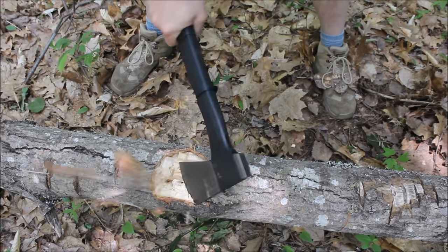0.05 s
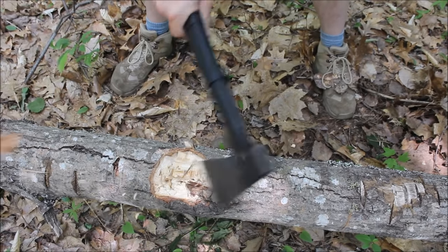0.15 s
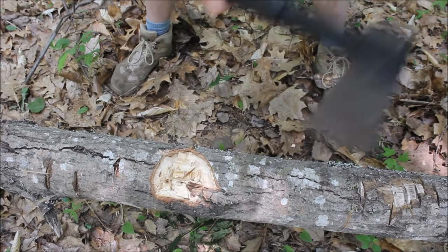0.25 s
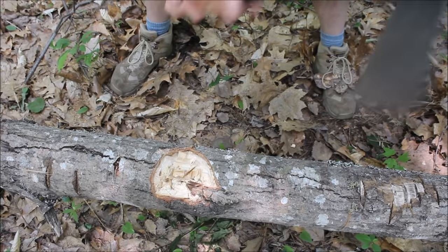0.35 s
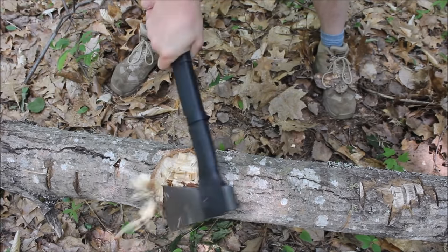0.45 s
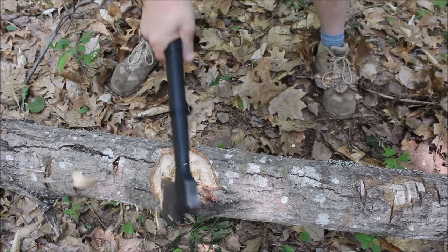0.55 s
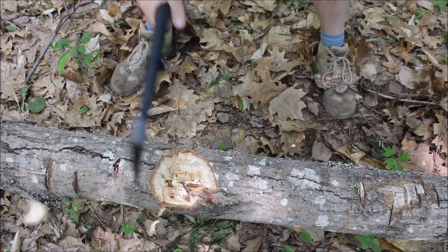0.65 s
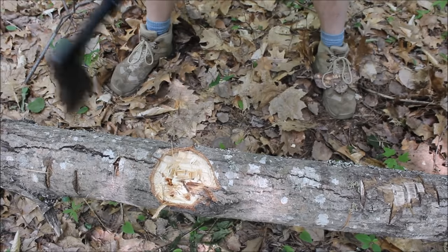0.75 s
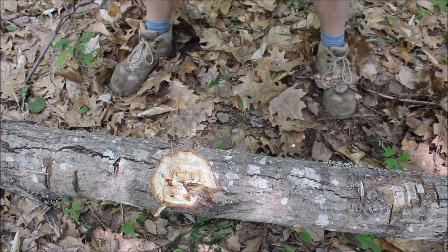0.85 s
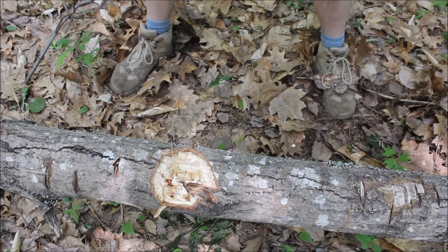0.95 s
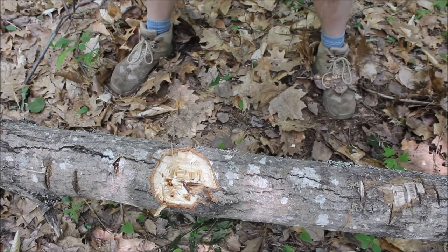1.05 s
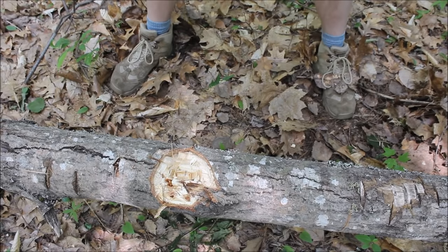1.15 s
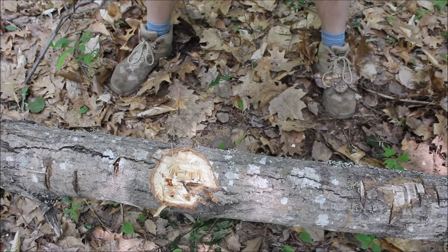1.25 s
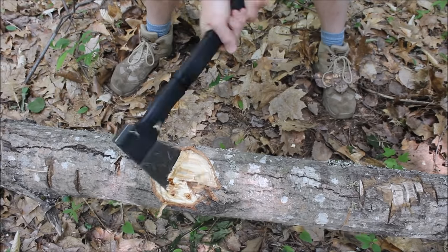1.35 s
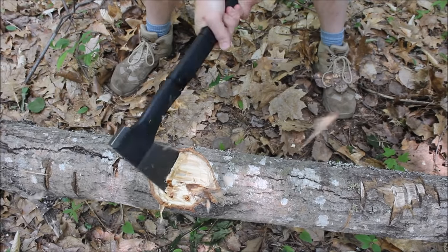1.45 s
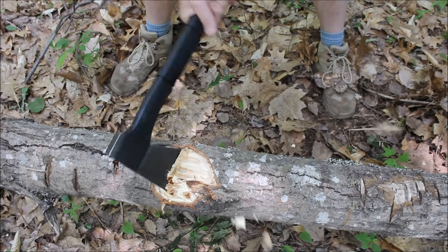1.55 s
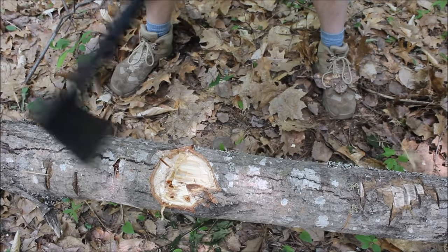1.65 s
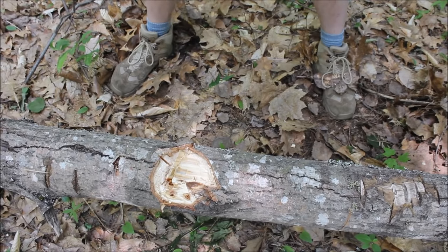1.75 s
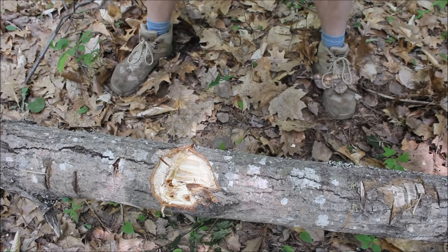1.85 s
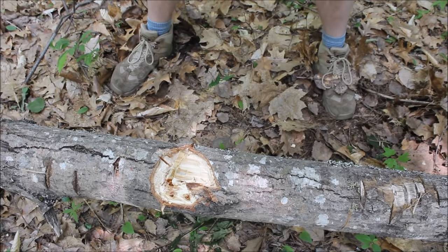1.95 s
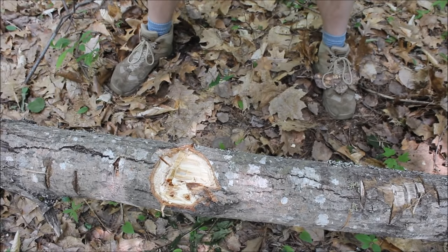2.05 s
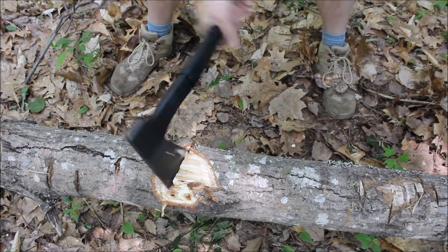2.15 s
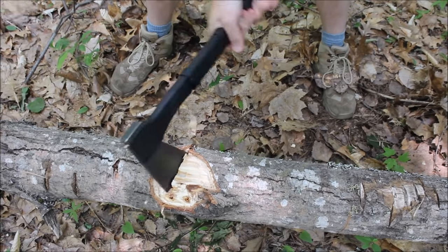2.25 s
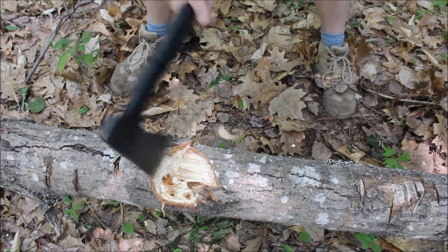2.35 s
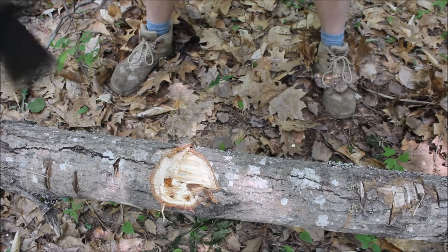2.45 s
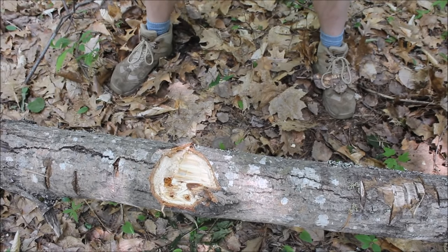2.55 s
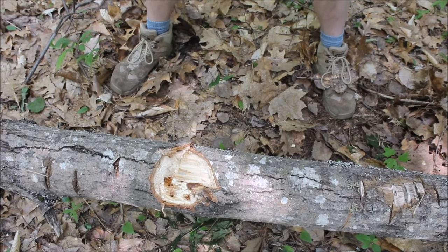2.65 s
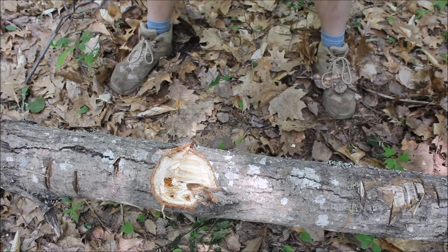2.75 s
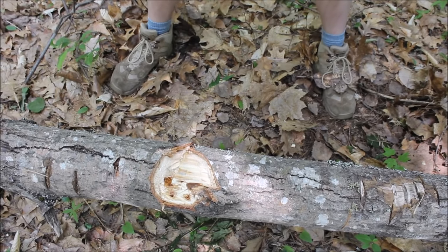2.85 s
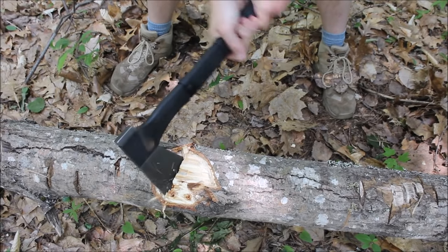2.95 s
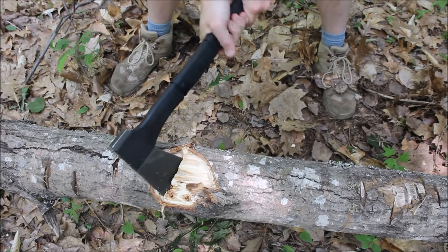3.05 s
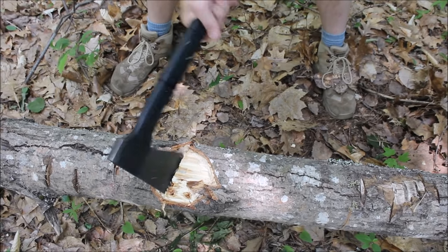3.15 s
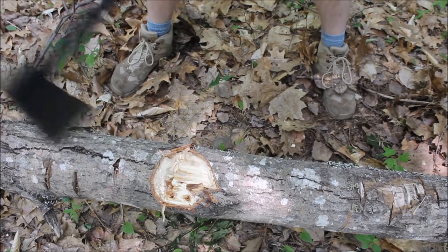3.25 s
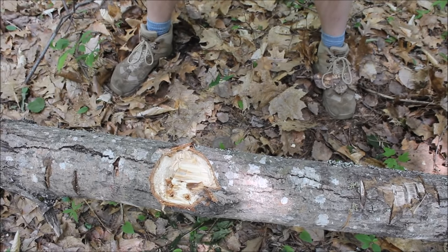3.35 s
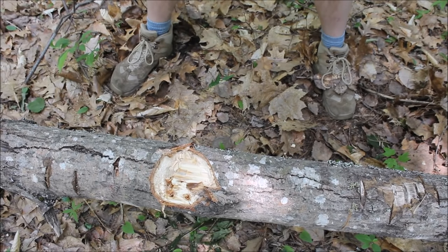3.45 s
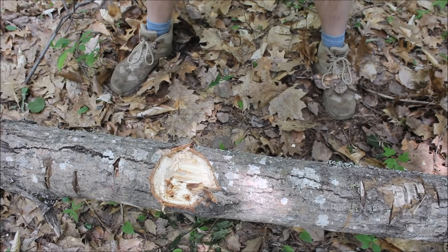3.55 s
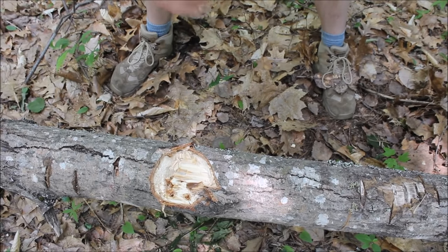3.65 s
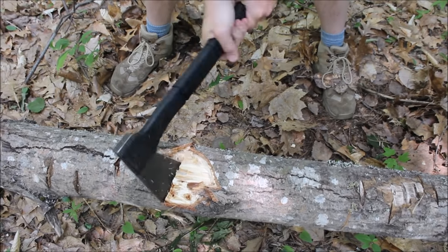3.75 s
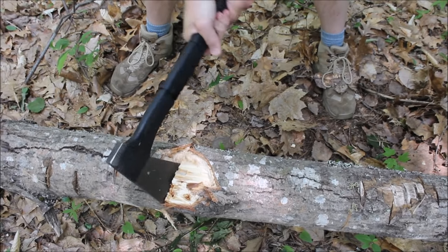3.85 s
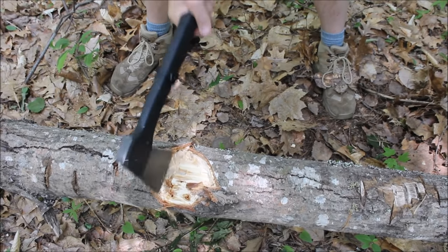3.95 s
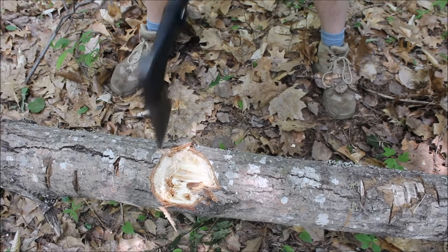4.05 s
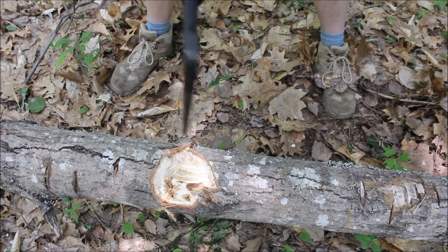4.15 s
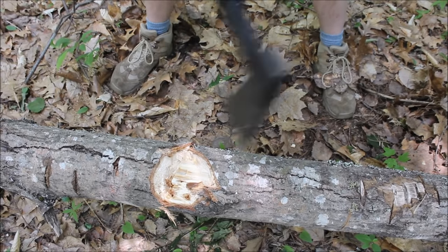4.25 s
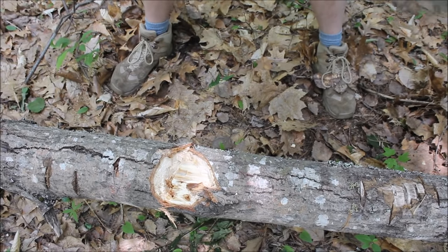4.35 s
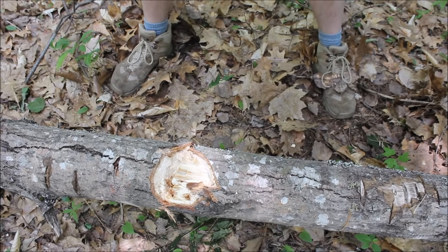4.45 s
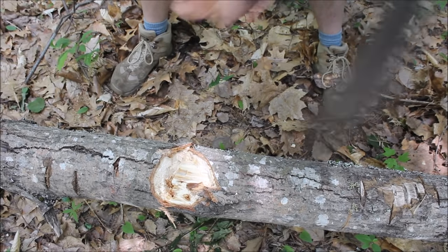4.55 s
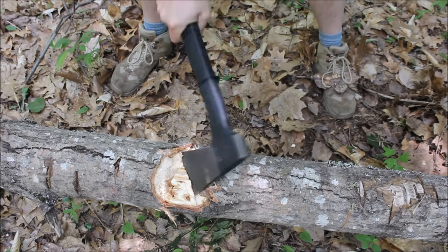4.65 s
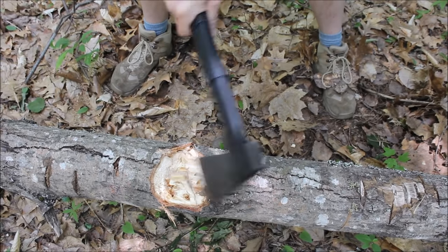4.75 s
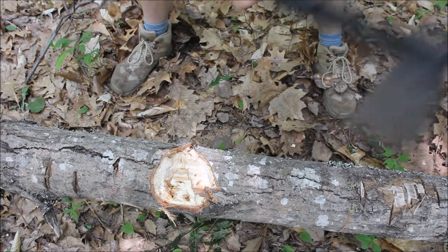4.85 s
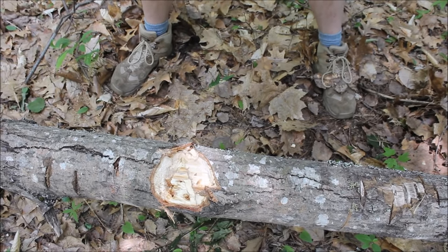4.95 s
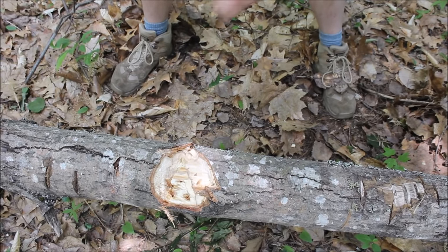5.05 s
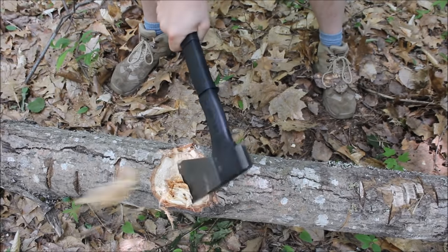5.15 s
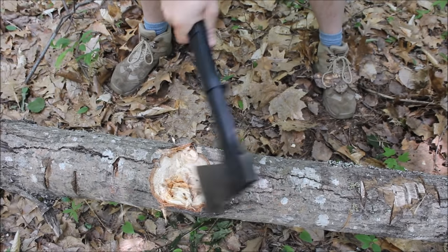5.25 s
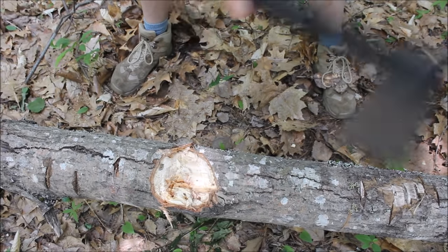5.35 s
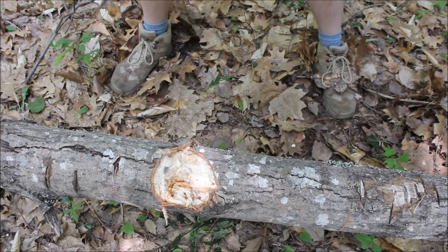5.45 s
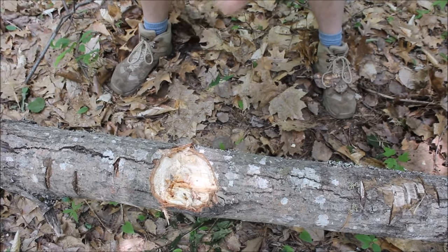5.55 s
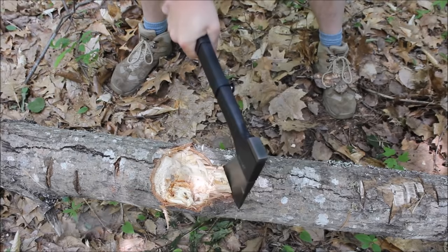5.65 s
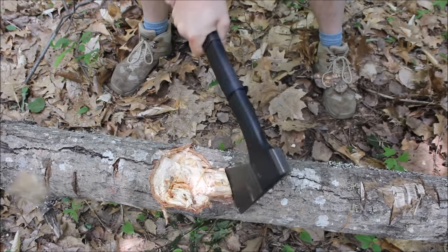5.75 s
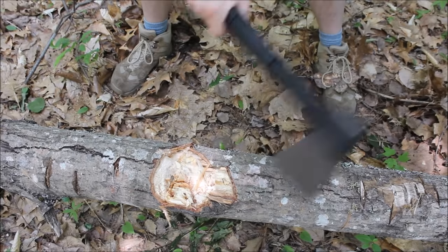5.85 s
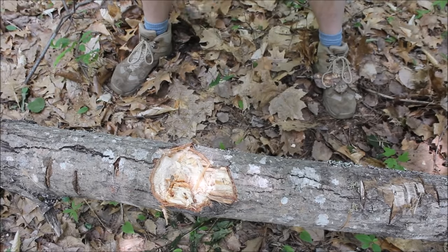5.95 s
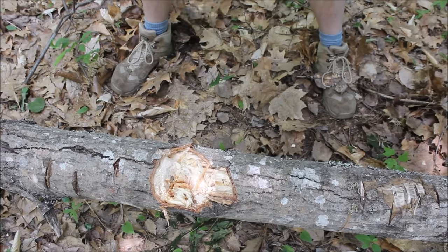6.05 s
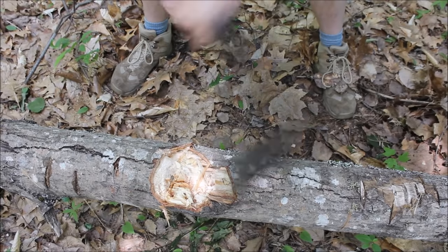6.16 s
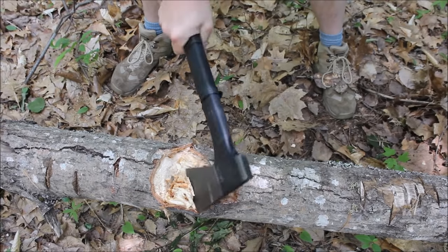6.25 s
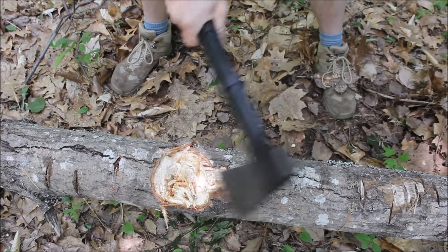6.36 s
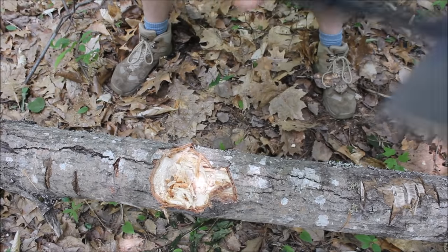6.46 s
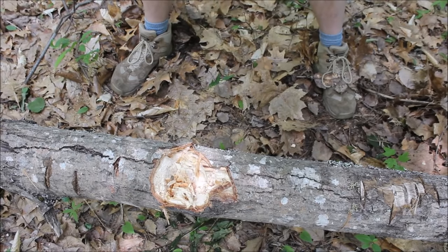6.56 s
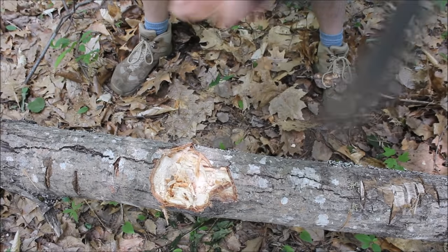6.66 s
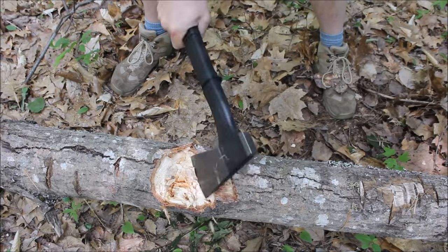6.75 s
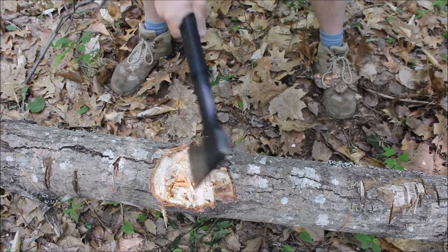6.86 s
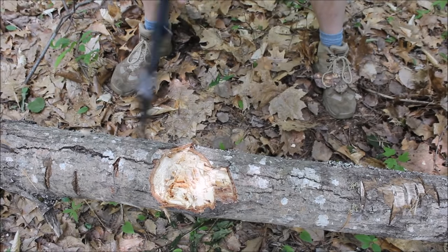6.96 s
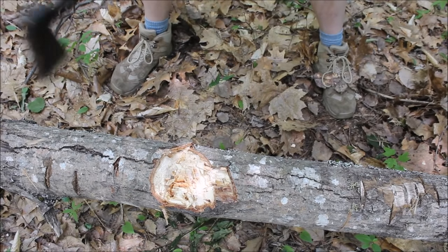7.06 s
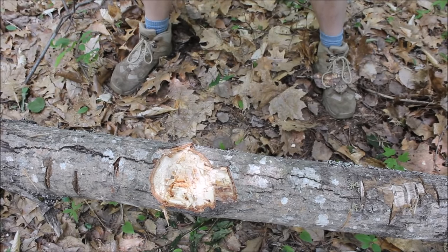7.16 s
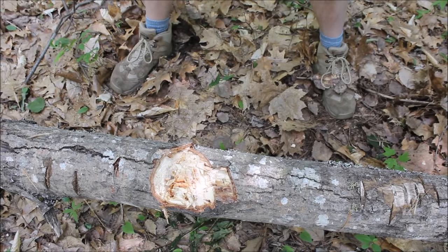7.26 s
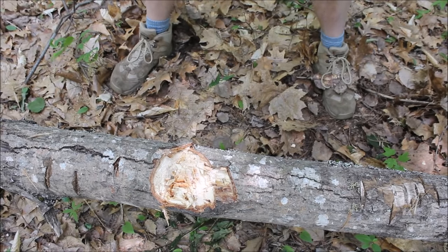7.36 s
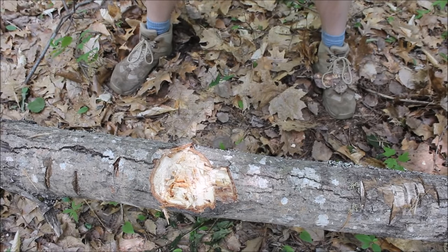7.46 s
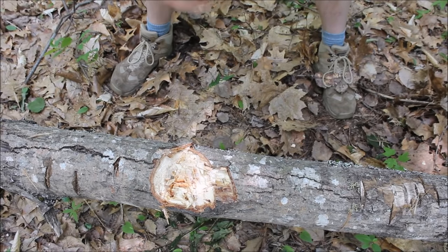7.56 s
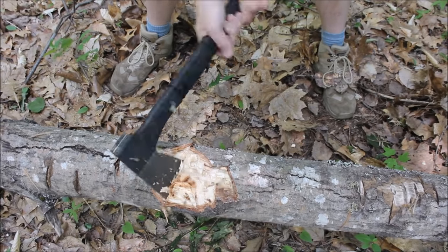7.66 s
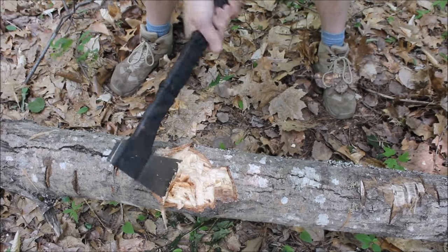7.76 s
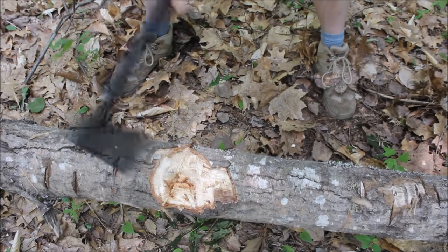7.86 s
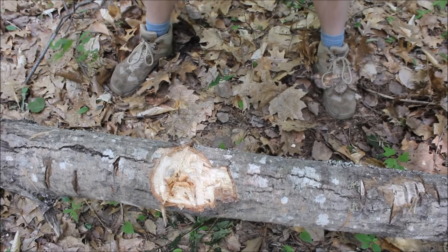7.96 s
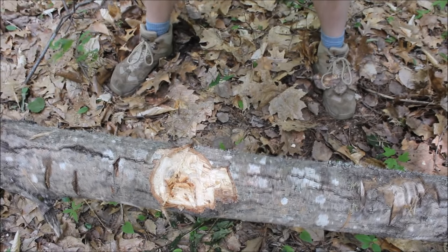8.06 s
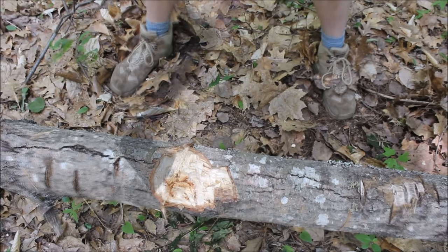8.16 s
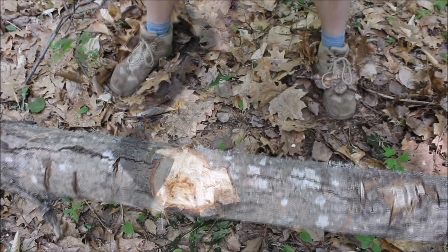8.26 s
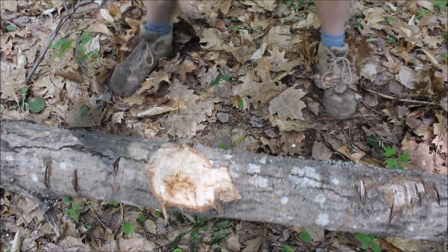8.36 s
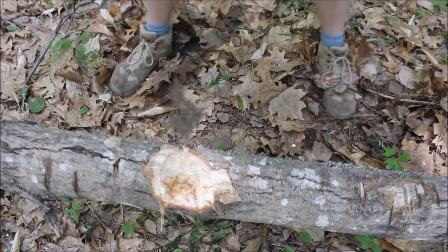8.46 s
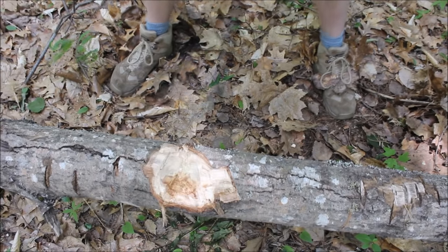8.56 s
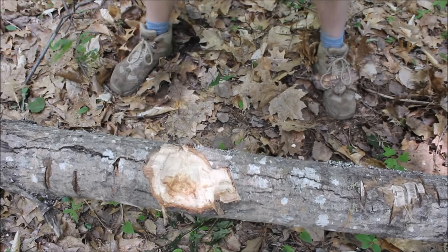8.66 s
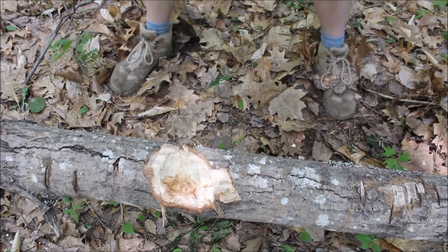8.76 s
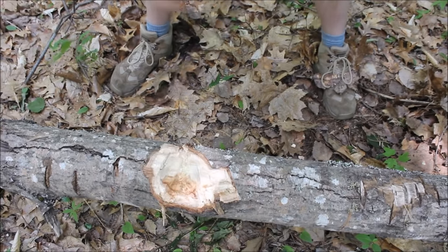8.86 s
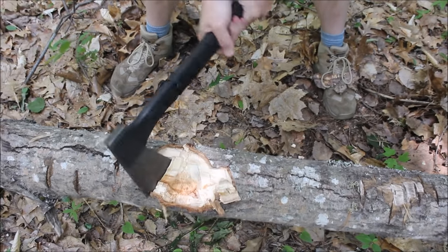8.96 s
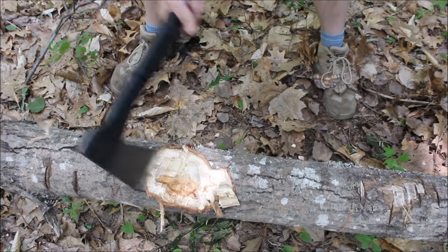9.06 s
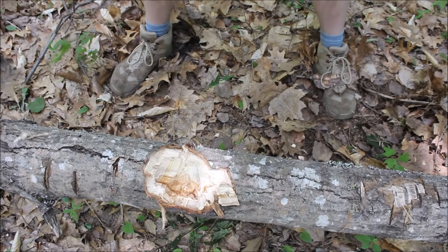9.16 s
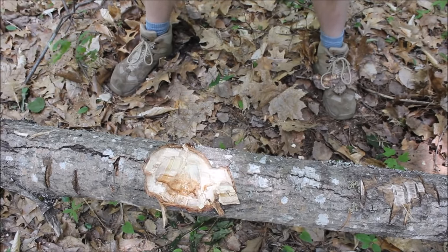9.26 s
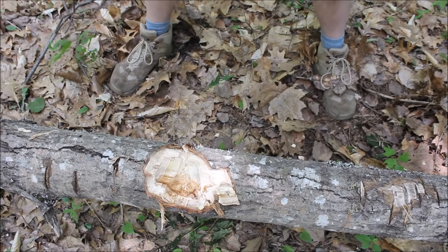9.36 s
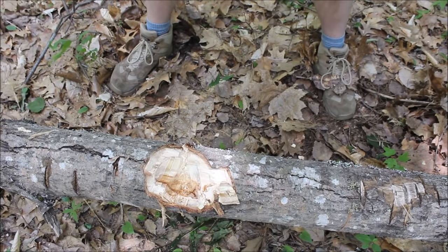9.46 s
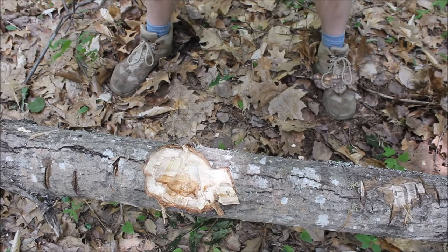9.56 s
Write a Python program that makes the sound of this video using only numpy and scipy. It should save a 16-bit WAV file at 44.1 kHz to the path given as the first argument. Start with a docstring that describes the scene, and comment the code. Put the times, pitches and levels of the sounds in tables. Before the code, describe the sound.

Fifteen single axe blows bite into a lying log over about nine seconds, each a short tearing crack with a hollow woody knock and sometimes a deep ground thump. Chips tick down and dry leaves crackle between them, most busily after the second chop, when boots shift. Close mono microphone in open woodland, loudest peaks clipped, only a faint tree echo.

```python
"""A hand axe cuts a notch in a log on dry leaves, close to the microphone on a forest floor.
Each chop is torn-fibre noise, two falling tones of wood, decaying log modes and a ground thump.
Between chops, snaps of chips and twigs, crackling litter and dull boot throbs are heard.
Sparse echoes return from the trees over a faint rumble, and the microphone input clips loud peaks."""
import sys
import numpy as np
from scipy import signal
from scipy.fft import rfft, irfft, next_fast_len
from scipy.io import wavfile
from scipy.ndimage import uniform_filter1d

SR = 44100
rng = np.random.default_rng(int(sys.argv[2]) if len(sys.argv) > 2 else 0)


def inscribe(sig):
    """Save sig as 16-bit PCM at rate SR to the path in sys.argv[1].

    A 1-D sig is mono; a 2-D sig holds one channel per row.
    Samples are clipped to [-1, 1] before scaling.
    """
    pcm = np.round(np.clip(np.atleast_2d(sig).T, -1, 1) * 32767)
    wavfile.write(sys.argv[1], SR, pcm.astype(np.int16))


N = 423801  # length [samples]


def gain_of(db):
    """Decibels to amplitude."""
    return 10 ** (np.asarray(db) / 20)


def evened(x):
    """Scales to rms 1."""
    return x / np.sqrt(np.mean(x ** 2) + 1e-20)


def read(points, hz):
    """Reads (frequency [Hz], value) rows on a log-frequency axis."""
    f, value = np.transpose(points)
    return np.interp(np.log(hz + 1), np.log(f + 1), value)


def add(mix, start_s, sound):
    """Adds a sound into the mix from its start time, cut off at the end of the mix."""
    part = mix[max(round(start_s * SR), 0):][:len(sound)]
    part += sound[:len(part)]


def coloured(x, spectrum):
    """Shapes x by a spectrum, at rms 1."""
    size = next_fast_len(len(x))
    gains = gain_of(read(spectrum, np.fft.rfftfreq(size, 1 / SR)))
    return evened(irfft(rfft(x, size) * gains, size)[:len(x)])


def resonate(x, hz, q):
    """One resonance, at rms 1; its bandwidth is capped when its centre is very high."""
    b, a = signal.iirpeak(min(hz, SR / 3), max(q, hz / (SR / 4)), SR)
    return evened(signal.lfilter(b, a, x))


def grains(count, spread_db):
    """Dense tiny fractures: noise samples whose sizes scatter by spread_db."""
    return rng.standard_normal(count) * gain_of(spread_db * rng.standard_normal(count))


def rumble(rumble_db, hz=58):
    """A faint low rumble in the open air: noise through two equal broad resonances."""
    return gain_of(rumble_db) * resonate(resonate(rng.standard_normal(N), hz, q=2.0), hz, q=2.0)


# echo of the surrounding trees: (frequency [Hz], relative level [dB], time to fade by 60 dB [s])
FOREST_ECHO = [(60, 15, 0.7), (256, 15, 0.3), (1000, 1, 0.97), (2300, 2, 1.2), (3200, 8.5, 0.46),
               (5070, 5.5, 1), (14100, -12, 1.1)]


def forest(chops, echo_db):
    """Trunks scatter the chops back as sparse echoes, each band fading at its own rate."""
    count = 3 * SR // 2
    arrives = rng.random(count) < 2500 / SR  # about 2500 echoes a second
    distant = np.arange(count) > .012 * SR  # none within the first 12 ms
    taps = grains(count, spread_db=-4.5) * arrives * distant
    hz, t, bins = signal.stft(taps, SR, nperseg=256)
    bands = np.array(FOREST_ECHO)
    level_db = read(bands[:, :2], hz)[:, None]
    t60 = read(bands[:, ::2], hz)[:, None]
    tail = signal.istft(bins * gain_of(level_db - 60 * t / t60), SR, nperseg=256)[1]
    return gain_of(echo_db) * signal.fftconvolve(chops, tail / np.linalg.norm(tail))[:N]


# a boot shifts and crushes dry leaves: (start time [s], length [s], crackle level [dB])
SHUFFLES = [(0.377, 0.11, -51), (0.567, 0.17, -56.5), (0.767, .02, -46.5), (0.882, 0.15, -44),
            (1.057, 0.19, -47.5), (1.29, 0.081, -46.5), (1.838, .12, -54.5), (2.002, 0.045, -48),
            (2.692, 0.3, -60), (4.37, 0.079, -54.5), (6.018, 0.24, -47.5), (6.452, 0.34, -52.5),
            (7.129, 0.29, -51.5), (7.313, 0.33, -46.5), (7.937, 0.55, -52.5), (8.593, 0.086, -45),
            (8.722, 0.38, -55), (9.414, .25, -53)]
# soft rustle underneath: (time [s], level [dB])
HUSH = [(0, -78), (.7, -67.5), (1.1, -50), (1.55, -60), (2.55, -56.5), (3.4, -61.5), (4.0, -55.5),
        (4.45, -52), (4.85, -62), (5.4, -71), (5.95, -59), (6.95, -60), (7.35, -50), (8.0, -48),
        (8.7, -50.5), (9.25, -53.5), (9.6, -46.5)]
# the rustle builds as the axe is raised and swung, and dies once the blade has landed
WIND_UP_DB_PER_S, SETTLE_DB_PER_S = 31.5, 108.5
PRESS_S, RELEASE_S = 0.0082, 0.051  # how fast a boot loads the leaves, and how fast they come to rest
EASE_DB_PER_S = 10.5  # the crackle thins out as the leaves under the boot flatten
SWING_CRACKLE_DB, HUSH_CRACKLE_DB = -4, -7.5  # dry crackle against soft brushing
SHUFFLE_BRUSH_DB = -13  # soft brushing against dry crackle


def stirring():
    """How strongly leaves brush and crackle: swings, shuffles and underlying rustle add in power."""
    t = np.arange(0, N / SR, 1 / 1000)
    swings, shuffles, last_chop = np.zeros(len(t)), np.zeros(len(t)), -1
    for s, *_, db in CHOPS:
        before, after = np.maximum(s - t, 0), np.maximum(t - s, 0)
        swing_db = db - WIND_UP_DB_PER_S * before - SETTLE_DB_PER_S * after
        swings += gain_of(swing_db) ** 2 * (t > last_chop)  # starts once the previous chop has landed
        last_chop = s
    for s, length, db in SHUFFLES:
        age = np.maximum(t - s, 0)
        load = np.minimum(age / PRESS_S, 1) * np.exp(-np.maximum(age - length, 0) / RELEASE_S)
        shuffles += (load * gain_of(db - EASE_DB_PER_S * age)) ** 2
    hush = gain_of(np.interp(t, *np.transpose(HUSH))) ** 2
    brush = swings + hush + shuffles * gain_of(SHUFFLE_BRUSH_DB) ** 2
    crackle = shuffles + swings * gain_of(SWING_CRACKLE_DB) ** 2 + hush * gain_of(HUSH_CRACKLE_DB) ** 2
    return [np.interp(np.arange(N) / SR, t, np.sqrt(power)) for power in (brush, crackle)]


def leaf_crackle(crackles_per_s=1100, size_db=4, decay_s=0.00036):
    """Single leaves flick and crack: sparse noise bursts ring at twelve pitches, one for each size of leaf."""
    out, pitches = np.zeros(N), np.geomspace(1300, 11000, num=12)
    for hz in pitches:
        sizes = gain_of(size_db * np.minimum(rng.exponential(1, N), 3.5))
        cracks = sizes * (rng.random(N) < crackles_per_s / (len(pitches) * SR))
        bursts = signal.lfilter([1], [1, -np.exp(-1 / (decay_s * SR))], cracks + 1e-9)
        out += resonate(bursts * rng.standard_normal(N), hz, q=1.38) * np.sqrt(hz)
    return evened(out)


# soft brushing of the litter: (frequency [Hz], relative level [dB])
BRUSH_SPECTRUM = [(30, 2), (60, -2), (100, -2), (200, -4.5), (450, -1), (1000, -1), (2200, -6), (4000, -8),
                  (9000, -22.5)]
# dry crackle of the leaves: (frequency [Hz], relative level [dB])
LEAF_SPECTRUM = [(100, -8), (700, -12), (2000, -1.5), (3500, -3), (6000, -4.5), (10000, -8.5),
                 (16000, -10.5)]


def litter(brush_level, crackle_level, clump_db=3.0, hiss_level=0.98, crackle_db=-0.5):
    """Dry leaves brush and crackle in clumps: shaped noise and leaf cracks swell irregularly."""
    clumps = uniform_filter1d(rng.standard_normal(N), SR // 80)
    clumps = evened(uniform_filter1d(clumps, SR // 200))
    crackle = coloured(hiss_level * rng.standard_normal(N) + leaf_crackle(), LEAF_SPECTRUM)
    brush = coloured(rng.standard_normal(N), BRUSH_SPECTRUM)
    brushing = brush * brush_level * gain_of(0.85 * clumps)
    return brushing + crackle * crackle_level * gain_of(crackle_db + clump_db * clumps)


# boots pressing the soft ground; each throb peaks at half its pulse time, 6 dB below the level given:
# (time [s], level [dB], centre frequency [Hz], pulse time [s])
BOOT_STEPS = [(0.995, -42, 95, 0.025), (1.076, -37, 86, 0.04), (1.125, -40, 57.6, 0.038),
              (1.183, -30.5, 118, .03), (1.288, -45, 95, 0.028), (1.33, -44, 50, 0.037),
              (2.04, -50.5, 70, 0.16)]


def boots(uneven_hz=28):
    """Weight lands on soft soil, which gives with a dull throb of wandering pitch."""
    out, t = np.zeros(N), np.arange(SR // 2) / SR
    for s, db, hz, pulse_s in BOOT_STEPS:
        pitch = hz + uneven_hz * evened(uniform_filter1d(rng.standard_normal(len(t)), SR // 100))
        thud = np.sin(2 * np.pi * np.cumsum(pitch) / SR)
        pulse = (t / pulse_s) * np.exp(1 - 2 * t / pulse_s)
        add(out, s, gain_of(db) * thud * pulse)
    return out


# leaves crunching around a snap: (frequency [Hz], relative level [dB])
CRUNCH_SPECTRUM = [(100, -21), (450, -2.5), (900, -3.5), (1800, -1.5), (3500, -5.5), (6000, -4.5),
                   (10000, -12.5), (16000, -19)]


def snap(hz, decay, crack_db=-5, settle_db=-21, settle_s=0.055):
    """A short cluster of fractures rings a twig or chip in two modes; leaves around it settle."""
    t = np.arange(SR // 6) / SR
    cracks, fade = grains(len(t), spread_db=7.5), np.exp(-t / decay)
    twig = resonate(cracks * fade, hz, q=7) + gain_of(-4) * resonate(cracks * fade, hz * 1.45, q=6)
    twig = evened(twig) * np.sqrt(np.mean(fade ** 2))
    leaves = coloured(cracks, CRUNCH_SPECTRUM)
    settling = gain_of(settle_db) * leaves * np.exp(-t / settle_s)
    return gain_of(crack_db) * (twig + leaves * fade) + settling


# lesser snaps come by chance; their level follows the stirring of the leaves
TICKS_PER_S, TICK_OVER_DB, TICK_SPREAD_DB, TICK_HZ, TICK_DECAY_S = 24, 13, 2, 3000, 0.0018


def ticks(stir, spread_octaves=.9, count=320):
    """Small stems and leaf ribs snap at random pitches, louder where the litter is stirred more."""
    out = np.zeros(N)
    draws = zip(rng.random((count, 2)), rng.standard_normal((count, 2)))
    for (place, chance), (size, pitch) in draws:
        tick = snap(TICK_HZ * 2 ** (spread_octaves * pitch), TICK_DECAY_S, settle_db=-37.5)
        if chance < TICKS_PER_S * N / SR / count:
            level = stir[int(place * N)] * gain_of(TICK_OVER_DB + TICK_SPREAD_DB * size)
            add(out, place * N / SR, level * tick)
    return out


# loudest chips landing and twigs snapping: (time [s], level [dB], centre frequency [Hz], decay [s])
SNAPS = [ (.308, -41, 3320, 0.005), (.66, -41, 1660, 0.0028), (.761, -23.5, 3300, 0.00071),
         (.93, -29.5, 3470, 0.0063), (.9835, -29.5, 4900, 0.0093), (.992, -31, 4000, 0.012),
         (1.075, -26, 1650, 0.0073), (1.107, -18.5, 2800, .0071), (1.142, -31, 3550, 0.0054),
         (1.187, -30, 2230, 0.0056), (1.205, -32.5, 3860, .017), (1.292, -20.5, 4400, 0.0027),
         (1.359, -29, 1100, .0026), (1.657, -40.5, 3100, 0.0086), (1.838, -34, 2220, 0.0066),
         (2.064, -34.5, 2490, .0031), (2.124, -34.5, 818, 0.0057), (2.508, -40, 4140, .0036),
         (2.715, -34.5, 1920, 0.0026), (2.775, -30.5, 2980, 0.00094), (2.857, -30, 1840, 0.0016),
         (2.959, -28, 3340, 0.013), (3.29, -33, 1270, 0.0018), (3.555, -36, 5750, 0.0025),
         (3.924, -43.5, 2960, .0025), (4.097, -38.5, 4550, 0.013), (4.349, -36, 1320, 0.0032),
         (4.382, -26.5, 3270, 0.003), (5.062, -35.5, 3020, 0.0034), (5.118, -38.5, 3790, .0024),
         (5.61, -40, 1380, 0.014), (5.904, -38.5, 2980, 0.016), (6.039, -27, 4460, 0.014),
         (6.23, -29, 3050, 0.011), (6.709, -39, 840, 0.0099), (6.978, -40, 1990, 0.0025),
         (7.081, -36.5, 2720, .0078), (7.216, -31, 4050, 0.0025), (7.326, -29.5, 646, 0.0056),
         (7.6603, -23.5, 3500, 0.0018), (7.752, -33.5, 1350, 0.0017), (8.095, -29.5, 1880, 0.0025),
         (8.163, -30.5, 4180, 0.0022), (8.222, -29, 3000, .004), (8.596, -34.5, 3450, 0.0036),
         (8.643, -34.5, 2540, 0.018), (9.428, -37, 2900, .0074)]


def snaps():
    """Chips land and twigs break, each as one cluster of fractures."""
    out = np.zeros(N)
    for s, db, hz, decay in SNAPS:
        add(out, s, gain_of(db) * snap(hz, decay))
    return out


def ground_thump(push_s=0.00091, push_db=-9, bounce_hz=59, bounce_db=-48, bounce_t60=1.0):
    """The whole log is shoved down by a brief pulse and sways on the springy soil."""
    t = np.arange(SR) / SR
    push = gain_of(push_db) * (1 - t / push_s) * np.exp(-t / push_s)
    return push + gain_of(bounce_db - 60 * t / bounce_t60) * np.sin(2 * np.pi * bounce_hz * t)


def rebound(after_s=0.0183, hz=350, width_s=0.0041, rebound_db=-25):
    """The log knocks back against the ground: a smooth tone burst just after the blow."""
    t = np.arange(SR // 2) / SR - after_s
    return gain_of(rebound_db) * np.cos(2 * np.pi * hz * t) * np.exp(-(t / width_s) ** 2)


# rattle of bark crumbs and leaves under the log: (frequency [Hz], relative level [dB])
SHIVER_SPECTRUM = [(100, -18.5), (400, 10), (800, -4.5), (2500, 5), (5000, -26), (14000, -36.5)]


def shiver(shiver_db=-47, settle_s=0.093):
    """Bark crumbs and the leaves under the log rattle as decaying noise after the blow."""
    t = np.arange(SR // 2) / SR
    rattle = coloured(grains(len(t), spread_db=0.0), SHIVER_SPECTRUM)
    return gain_of(shiver_db) * rattle * np.exp(-t / settle_s)


# bending modes of the log: (frequency [Hz], relative level [dB], time to fade by 60 dB [s])
LOG_MODES = [(124, -44.5, 0.51), (149.8, -37, 0.29), (197, -34, 0.13), (237.2, -21.5, 0.13),
             (292, -22.5, 0.066), (370, -31.5, 0.17), (443, -32.5, 0.14), (524, -24.5, 0.091),
             (605, -17.5, 0.064), (704.6, -19, 0.067), (787, -26.5, 0.095), (971, -18, 0.059),
             (1116, -15, 0.041), (1337, -15.5, 0.042), (2573, -24.5, 0.058)]


def log_ring(tilt_db, pivot_hz=400, knock_hz=205, knock_db=-7):
    """The log bends under the blow with a dull knock and rings in its modes."""
    t = np.arange(SR // 2) / SR
    ring = np.zeros(len(t))
    for k, (hz, db, t60) in enumerate(LOG_MODES):
        # each chop lands on another spot, which weights and detunes the modes a little
        mode_db = db + tilt_db * np.log2(hz / pivot_hz) + 0.59 * rng.standard_normal()
        mode_hz = hz * (1 + 0.015 * rng.standard_normal())
        sense = (-1) ** k  # neighbouring modes swing in opposite senses
        ring += sense * gain_of(mode_db - 60 * t / t60) * np.sin(2 * np.pi * mode_hz * t)
    knock = gain_of(knock_db) * np.sin(2 * np.pi * knock_hz * t) * np.exp(-t / 0.0022)
    return ring * (1 - np.exp(-t / 0.0013)) + knock


# tearing wood: (frequency [Hz], relative level [dB])
FIBRE_SPECTRUM = [(30, -28), (120, -6), (250, -4.5), (600, 3.5), (1200, 2.5), (2800, 7.5), (4500, 1),
                  (8000, -3.5), (12000, -9.5), (16000, -5.5)]


def cut(length, low_hz, low_db, high_hz, high_db, fibre_db, chip_s, chip_db, sag=0.088, wander_hz=170):
    """The slowing blade tears fibres; the wood beside the cut rings, and a chip breaks off."""
    t = np.arange(SR // 5) / SR
    depth, stopped = np.minimum(t / length, 1), np.maximum(t - length, 0)
    bite = np.minimum(t / 0.00027, 1) * gain_of(-5 * depth)
    # once the blade stops, the tearing dies away in three overlapping decays
    dying = np.exp(-stopped / 0.0013)
    dying += gain_of(-14.5) * np.exp(-stopped / 0.0058)
    dying += gain_of(-30) * np.exp(-stopped / 0.016)
    fibres = gain_of(fibre_db) * bite * dying * coloured(grains(len(t), spread_db=3.5), FIBRE_SPECTRUM)
    ring = np.zeros(len(t))
    for hz, db in (low_hz, low_db), (high_hz, high_db):
        # the chip grows longer as the wedge sinks in, so its pitch falls, unevenly
        wander = evened(uniform_filter1d(rng.standard_normal(len(t)), SR // 1200))
        pitch = hz * (1 + sag * (.5 - depth)) + wander_hz * wander
        ring += gain_of(db) * np.sin(2 * np.pi * np.cumsum(pitch) / SR)
    ring *= bite * np.exp(-stopped / 0.00073)
    breaking = np.exp(-abs(t - chip_s) / 0.0037) * depth
    chip = gain_of(chip_db) * breaking * coloured(grains(len(t), spread_db=3), FIBRE_SPECTRUM)
    return fibres + ring + chip


# one row a chop: (time [s], length of the cut [s], low ring [Hz], its level [dB], high ring [Hz],
#   its level [dB], tearing fibres [dB], log response [dB], brightness of the log ring [dB per octave],
#   ground thump [dB], chip breaks after [s], chip level [dB], rustle of the swing [dB])
CHOPS = [ (0.1074, 0.006, 1483, -8.5, 2740, -27, -5, -5, 1, -16, 0.0058, -10.5, -46),
         (0.4901, 0.0028, 950, -14, 5170, -7.5, -4.5, -9, 4, -37, 0.0098, -10.5, -54),
         (1.391, .0066, 1460, -4, 3124, -6, -3.5, -.5, 2, 4, 0.011, -16.5, -52),
         (2.2175, 0.0045, 1933, 5.5, 3026, 5.5, -0.5, 2, 0, 3, .0085, -40, -48),
         (3.012, 0.0059, 1025, 2, 2480, -3.5, -.5, 0, 1.5, -12, 0.011, -28, -46.5),
         (3.7694, 0.0067, 599, -3.5, 1362, -2, -3, 2.5, 0.5, 1, 0.0037, -21, -49),
         (4.6685, 0.0036, 1622, -8.5, 3716, -10.5, 2.5, -5, -2.5, -6, 0.0075, -23.5, -50.5),
         (5.2014, 0.0061, 1878, -3, 2993, -4.5, -4.5, -13.5, 2.5, -27, .0027, -20.5, -52),
         (5.7086, 0.0017, 1550, -1.5, 3770, -2.5, -0.5, -3, 0.5, -9, 0.021, -33.5, -53),
         (6.2512, 0.0031, 2040, -3.5, 4050, -7, 1, -5, 0.5, 1, 0.0099, -30, -47.5),
         (6.7698, 0.0045, 1830, -15, 3470, -4.5, -1.5, -4, 0, 0.5, 0.0031, -7, -51.5),
         (7.669, 0.0054, 1088, 0.5, 1352, 0.5, -2, 3, 3, -15, 0.013, -30, -52.5),
         (8.2328, 0.0046, 2140, -23, 3310, -12, 0.5, -5, -2, 7, 0.013, -21, -45.5),
         (8.4751, 0.0039, 1421, 1.5, 2905, -8, -5, 0.5, -3.5, 5, 0.0096, -14.5, -48.5),
         (8.9845, .004, 2850, -12, 4320, 0, .5, 0, 0.5, -3, .0049, -19, -42.5)]


def axe():
    """All the chops; the harder the log is struck, the harder it rebounds."""
    out = np.zeros(N)
    for (s, length, low_hz, low_db, high_hz, high_db, fibre_db,
         log_db, tilt_db, thump_db, chip_s, chip_db, _) in CHOPS:
        add(out, s, cut(length, low_hz, low_db, high_hz, high_db, fibre_db, chip_s, chip_db))
        add(out, s, gain_of(log_db) * (log_ring(tilt_db) + shiver() + rebound()))
        add(out, s, gain_of(thump_db) * ground_thump())
    return out


def scene():
    """Chops and their echo over the sounds of the forest floor, as one channel."""
    chops = axe()
    brush_level, crackle_level = stirring()
    ground = snaps() + boots() + litter(brush_level, crackle_level) + ticks(crackle_level)
    return (chops + forest(chops, echo_db=-40) + ground + rumble(rumble_db=-69))[None]


CLIP_LEVEL = 0.56  # amplitude at which the microphone input overloads
EDGE_HZ = 16100  # upper band limit


def record(dry, low_cut_hz=28):
    """The microphone input clips peaks flat; then come the low cut and the upper band limit."""
    clipped = np.clip(dry, -CLIP_LEVEL, CLIP_LEVEL)
    low_cut = signal.lfilter(*signal.butter(1, low_cut_hz, "high", fs=SR), clipped)
    band_limit = signal.firwin(255, EDGE_HZ, window=("kaiser", 9), fs=SR)
    return signal.oaconvolve(low_cut, band_limit[None], "same")


dry = scene()
out = record(dry)
inscribe(out)
```